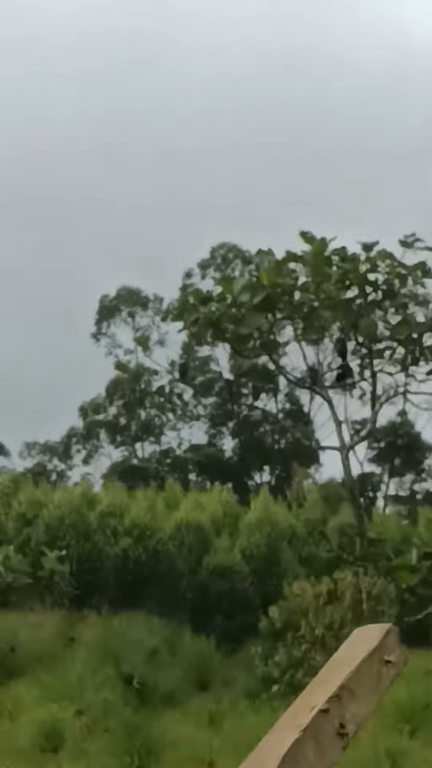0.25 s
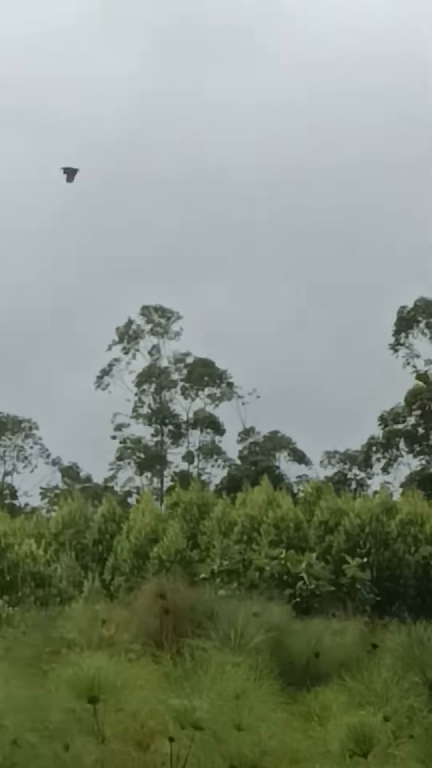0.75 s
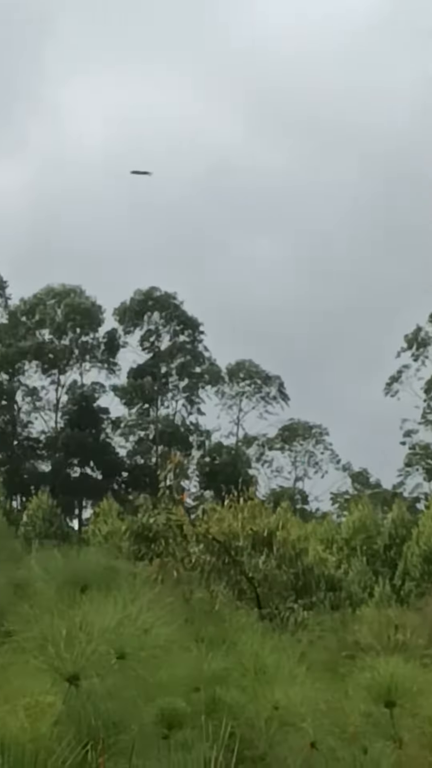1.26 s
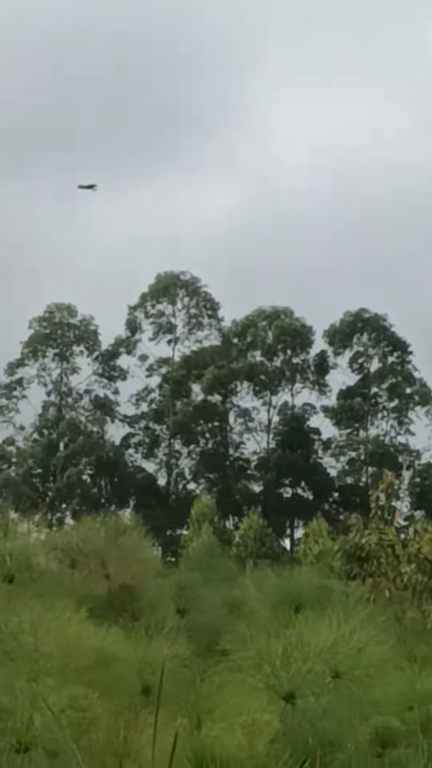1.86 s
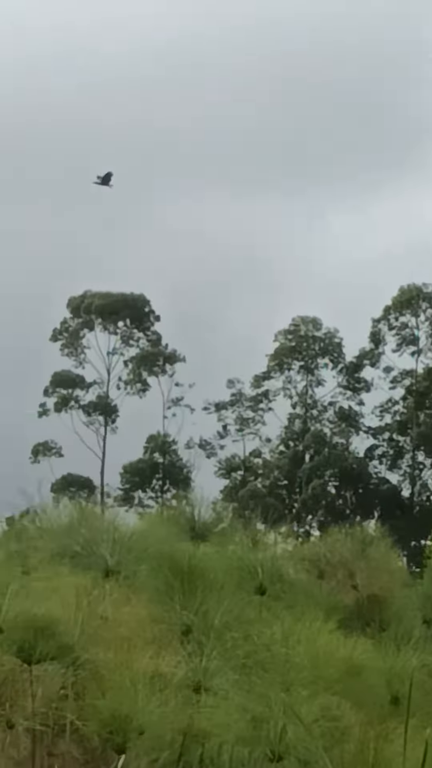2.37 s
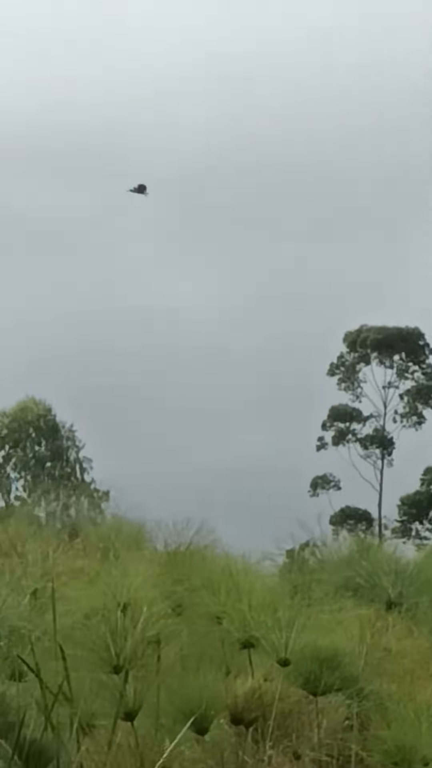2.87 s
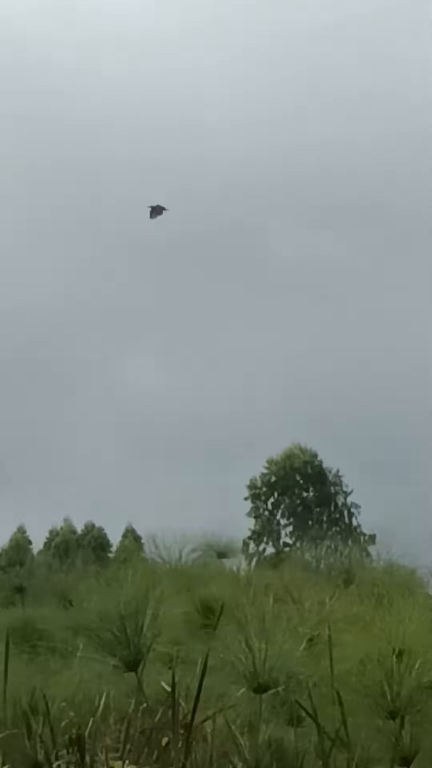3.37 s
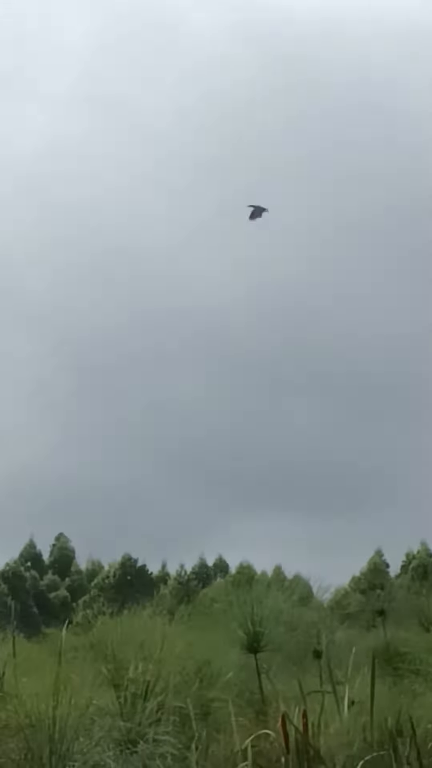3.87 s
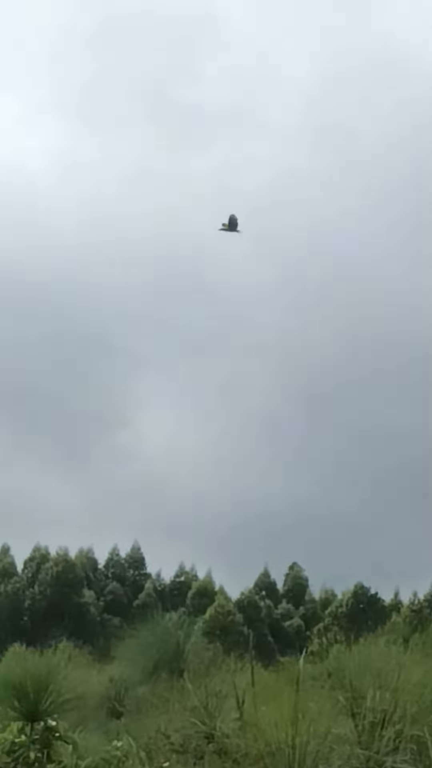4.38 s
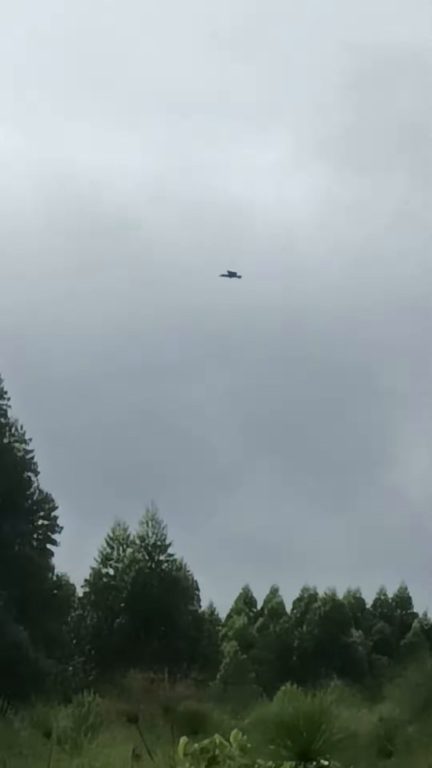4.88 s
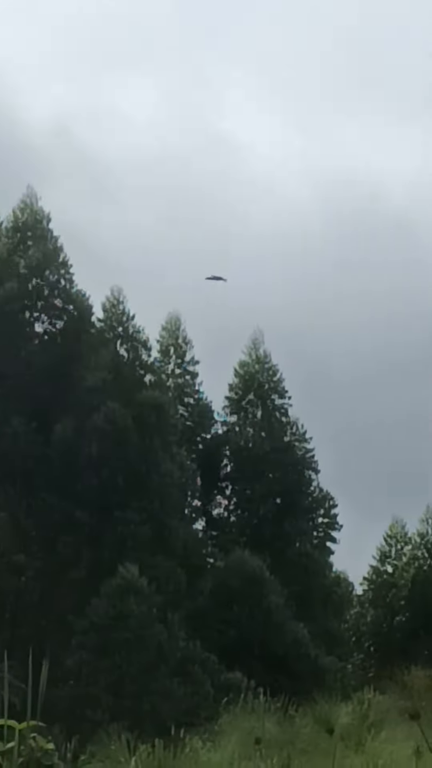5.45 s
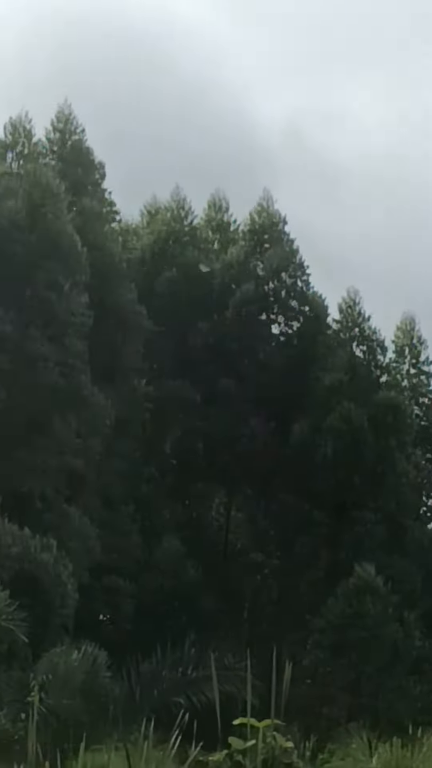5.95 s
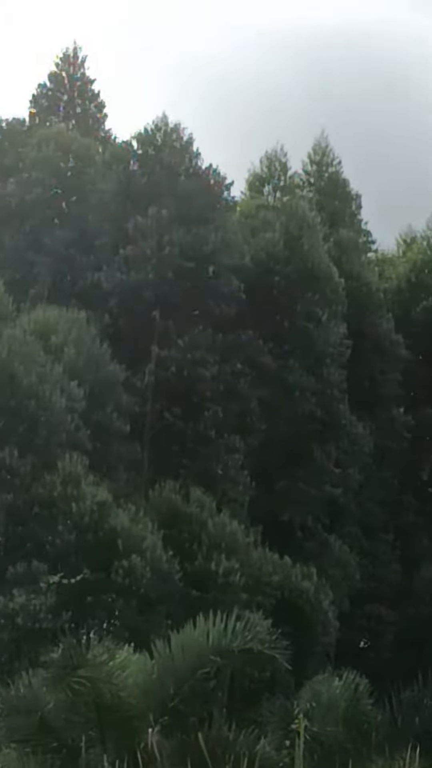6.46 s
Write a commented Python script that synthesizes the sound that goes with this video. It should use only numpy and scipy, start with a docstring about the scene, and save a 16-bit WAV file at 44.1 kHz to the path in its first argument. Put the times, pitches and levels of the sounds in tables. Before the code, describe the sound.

One long nasal, hoarse-edged bird cry echoes off trees over buzzing, chirping insects, then four evenly spaced sharp clacks and a dull bump.

```python
"""Insects buzz and chirp from the first moment, over a low rumble, while small birds whistle far off.
In this open marsh an ibis soon gives one long nasal cry: harmonics shaped by throat resonances, rising,
sinking and breaking up, and trees throw it back. Later four sharp clacks ring broad resonances half a
second apart, and a soft dull bump follows. Insects are pulsed noise bands and gliding tones, the birds
gliding sines, rumble and air filtered noise. Two spaced microphones hear it."""
import sys
import numpy as np
from scipy import signal
from scipy.fft import rfft, irfft
from scipy.io import wavfile
from scipy.ndimage import uniform_filter1d

SR = 44100
rng = np.random.default_rng(int(sys.argv[2]) if len(sys.argv) > 2 else 0)


def generate_wav(sig):
    """Save sig (samples, or channels by samples) to the path in sys.argv[1] as 16-bit PCM at SR."""
    pcm = np.round(np.clip(np.atleast_2d(sig).T, -1, 1) * 32767).astype(np.int16)
    wavfile.write(sys.argv[1], SR, pcm)


N = 296352
T = np.arange(N) / SR
HZ = np.fft.rfftfreq(2 * N, 1 / SR)
MIC_LAG_S = 0.00102


def undb(db):
    """Logarithmic level: decibels become an amplitude gain."""
    return 10 ** (np.asarray(db) / 20)


def unit(x):
    """Normalisation: scale to an rms of 1."""
    return x / np.sqrt(np.mean(x ** 2))


def curves(table):
    """Linear interpolation: each column of a time table, one value a sample."""
    s, *columns = np.transpose(table)
    return [np.interp(T, s, c) for c in columns]


def gain_at(hz, spectrum):
    """Frequency response: gain of a (frequency [Hz], level [dB]) table, interpolated on log frequency."""
    f, db = np.transpose(spectrum)
    return undb(np.interp(np.log(hz + 1), np.log(f), db))


def colour(x, spectrum):
    """Linear filtering: multiply the spectrum of a sound by a frequency response."""
    return irfft(rfft(x, 2 * N) * gain_at(HZ, spectrum))[..., :N]


def resonate(x, hz, width):
    """Resonance: one peak applied twice, for steep skirts."""
    b, a = signal.iirpeak(hz, hz / (1.55 * width), fs=SR)
    return signal.lfilter(b, a, signal.lfilter(b, a, x))


def walk(rate):
    """Random modulation: a continuous wander of spread 1 with `rate` new values a second."""
    levels = rng.standard_normal(8192)
    return unit(np.interp(T * rate, np.arange(len(levels)), levels))


def ports(x, pan_db, lag_s=MIC_LAG_S):
    """Time and level differences: the left microphone hears it later, the right one pan_db weaker."""
    left = np.pad(x, (round(lag_s * SR), 0))[:N]
    right = x * undb(-np.clip(pan_db, -3, 20))
    return np.array([left, right])


def echoes(x, t60, onset_s, spectrum, grain_db=4):
    """Diffuse scattering: many surfaces, a few strong, build up and decay, unrelated left and right."""
    t = T[:2 * SR]
    strength_db = grain_db * rng.standard_normal((2, len(t) // 100))
    strength = undb(np.repeat(strength_db, 100, axis=1))
    envelope = undb(-60 * t / t60) * (1 - np.exp(-t / onset_s))
    response = rng.standard_normal((2, len(t))) * strength * envelope
    response /= np.sqrt(np.sum(response ** 2, axis=1, keepdims=True))
    scattered = signal.fftconvolve(x[None], response, axes=1)[:, :N]
    return colour(scattered, spectrum)


# strength and direction of the cry: (time [s], relative level [dB], left minus right [dB])
CRY = [(1.418, -29.5, 6), (1.5, -30, 13), (1.56, -25.5, 10), (1.79, -25, 9.5), (1.849, -30.5, 16.5),
       (2.12, -31.5, 12.5), (2.26, -29.5, 10.5), (2.32, -37.5, 9), (2.37, -33.5, 5), (2.54, -34.5, 7)]
# fundamental of the cry: (time [s], frequency [Hz])
CRY_PITCH = [(1.42, 333), (1.444, 420.5), (1.462, 476.3), (1.518, 538.3), (1.578, 554.4), (1.738, 542.2),
             (2.002, 502.3), (2.33, 471.3), (2.454, 418), (2.476, 404.5), (2.504, 353.7), (2.54, 348.2)]
# resonances of throat and bill: (frequency [Hz], relative level [dB])
THROAT = [(520, -18), (740, -7), (900, -16.5), (1080, -19.5), (1450, -0.5), (1700, 5), (2200, -13.5),
          (2550, -27), (2950, -18), (3350, -32.5), (3750, -8.5), (4200, -21.5), (4600, -7.5), (5400, -5.5),
          (7300, -27), (8500, -33), (9600, -21.5), (10700, -35), (11700, -30.5), (14000, -60)]
# spectrum the trees send back: (frequency [Hz], relative level [dB])
TREES = [(400, -10), (1000, 4), (1700, -3.5), (2500, 4.5), (5000, -3), (10000, -43)]
CRY_LAG_S = 0.00094
HOARSE_JITTER = 0.0282  # spread of the pitch, as a fraction, at roughness 1


def ibis():
    """Source and filter: harmonics of a gliding pitch pass fixed throat resonances, hoarse at both ends."""
    hz, = curves(CRY_PITCH)
    db, pan_db = curves(CRY)
    envelope, treble, rough = cry_shape()
    on = envelope > 0
    # the membranes beat unevenly, the more so the hoarser the voice
    hz = hz * (1 + 0.00062 * walk(60) + HOARSE_JITTER * rough * walk(500))
    phase = 2 * np.pi * np.cumsum(hz) / SR
    body, edge = np.zeros(N), np.zeros(N)
    for k in range(1, 28):
        # shifting paths through the air make each harmonic flutter, the high ones most
        flutter = undb(0.83 * np.sqrt(k) * walk(20)[on])
        size = gain_at(k * hz[on], THROAT) * flutter
        partial = size * np.sin(k * phase[on] + rng.uniform(0, 2 * np.pi))
        # crossfade from body to edge between 2700 and 3500 Hz
        high = np.clip((k * hz[on] - 2700) / 800, 0, 1)
        body[on] += (1 - high) * partial
        edge[on] += high * partial
    # even out each part's strength over 25 ms, so that the envelopes below set it
    body, edge = (x / np.sqrt(np.abs(uniform_filter1d(x ** 2, SR // 40)) + 1e-5) for x in (body, edge))
    breath = unit(colour(rng.standard_normal(N), THROAT))
    rasp = breath * (1 + np.cos(phase)) * rough * undb(-17)
    body = envelope * undb(db) * (body + rasp)
    edge = envelope * treble * edge
    voice = body + edge
    left, right = ports(body, pan_db, CRY_LAG_S) + ports(edge, pan_db=11.0, lag_s=CRY_LAG_S)
    # the right side is shaded unevenly across the spectrum
    right = colour(right, [(500, 6.5), (1100, -2.5), (1600, -7), (2200, 8.5),
                           (3900, 5.5), (6300, 2.5), (9500, 2.5), (13000, 13.5)])
    early = echoes(voice, t60=0.28, onset_s=0.0049,
                   spectrum=[(500, -9), (1600, 7), (3000, 14.0), (5000, 9), (12000, 13)])
    late = echoes(voice, t60=2.49, onset_s=0.0067, spectrum=TREES)
    reflected = undb(-14.5) * early + undb(-15.5) * late
    return np.array([left, right]) + reflected * undb([[0], [-4]])


CRY_ATTACK_S, CRY_RELEASE_S, CRY_RELEASE_DB = 0.027, 0.1, -12.5
# the treble sags through the cry and drops further as it breaks up
CRY_TREBLE_DB, TREBLE_SAG_DB_PER_S, TREBLE_ATTACK_S, TREBLE_BREAK_DB = -31, 8, 0.058, -4
# roughness added at the start, held throughout and added at the end; how soon it clears and how long it breaks
HOARSE_START, HOARSE_HELD, HOARSE_END, CLEARS_S, BREAKS_S = 1, 0.05, 0.28, 0.11, 0.2


def cry_shape():
    """Temporal envelope: the cry swells, holds and dies away; treble comes later; both ends are hoarse."""
    start, end = CRY[0][0], CRY[-1][0]
    age = np.maximum(T - start, 0)

    def ending(length_s):
        """Linear ramp: 0 to 1 over the last length_s of the cry."""
        return np.clip(1 + (T - end) / length_s, 0, 1)

    attack = 1 - np.exp(-age / CRY_ATTACK_S)
    release = undb(CRY_RELEASE_DB * ending(CRY_RELEASE_S))
    envelope = attack * release * np.interp(T, [end, end + 0.0082], [1, 0])
    treble_db = CRY_TREBLE_DB - TREBLE_SAG_DB_PER_S * age + TREBLE_BREAK_DB * ending(BREAKS_S)
    treble = undb(treble_db) * (1 - np.exp(-age / TREBLE_ATTACK_S))
    rough = HOARSE_HELD + HOARSE_START * np.exp(-(age / CLEARS_S) ** 2)
    rough = rough + HOARSE_END * np.minimum(2 * ending(BREAKS_S), 1)
    return envelope, treble, rough


# clacks: (time [s], relative level [dB], body [dB], treble [dB], tail [dB], tail treble [dB], pitch factor [1])
CLACKS = [(4.67, -23.5, -8.5, -13, -11.5, 4.5, 1), (5.2023, -24, 1.5, 4, -12.5, 1, 0.99),
          (5.7157, -18, -4.5, 0, -9, 1.5, 0.983), (6.2337, -19.5, 5.5, 13.5, -9, 2.5, 0.94)]
# resonances a clack rings with: (frequency [Hz], width [Hz], relative level [dB])
CLACK_MODES = [(1045, 99, -10), (1505, 236, 5.5), (2886, 290, 4), (3920, 1270, 1.5), (8900, 1700, -9)]
# spectrum of the clacks scattered by the reeds: (frequency [Hz], relative level [dB])
CLACK_TAIL = [(400, -39), (900, -9.5), (1500, -1), (2200, -6), (3100, 4.5), (5200, 0.5), (6600, -0.5),
              (9600, -2.5), (11500, -9), (14000, -26)]


def clacks():
    """Impact excitation: a sharp blow rings broad modes for milliseconds; reeds and trees scatter it longer."""
    direct, scatter = np.zeros(N), np.zeros((2, N))
    # echoes arrive in clumps and interfere, so the tail is grainy and its spectrum ribbed
    ribs = undb(3 * np.interp(HZ, np.arange(400) * 110, rng.standard_normal(400)))
    hiss = irfft(rfft(rng.standard_normal((2, N)), 2 * N) * ribs)[:, :N]
    hiss = unit(colour(hiss, CLACK_TAIL) * undb(1.27 * walk(350)))
    sheen = colour(hiss, [(6500, -44), (9000, 6), (10800, 10), (12000, -30)])
    t = T[:SR // 20]
    swell = np.exp(-t / 0.0037) * (1 - np.exp(-t / 0.0032))
    for s, db, body_db, treble_db, tail_db, sheen_db, pitch in CLACKS:
        ring = 0
        for hz, width, mode_db in CLACK_MODES:
            mode = resonate(rng.standard_normal(len(t)) * swell, hz * pitch, width)
            tilt_db = body_db * (hz < 2000) + treble_db * (hz > 3500)
            ring = ring + unit(mode) * undb(mode_db + tilt_db)
        i = int((s - MIC_LAG_S) * SR)
        direct[i:i + len(t)] += unit(ring) * undb(db - 16.0)
        age = np.maximum(T - s, 0)
        # a fast and a slow decay together
        fade = undb(-60 * age / 0.14) + undb(-6.5) * undb(-60 * age / 0.79)
        fade = fade * (1 - np.exp(-age / 0.0011))
        tail = hiss + sheen * (undb(sheen_db) - 1)
        scatter += tail * undb(db + tail_db - 4.5) * fade
    return ports(direct, pan_db=7.5) + scatter * undb([[0], [-3.5]])


def insects():
    """Superposition: a rasp and chirps close by, with their scatter, add to wide choruses."""
    near = chirps() + rasp()
    scattered = echoes(near, t60=0.17, onset_s=0.0021, spectrum=[(5000, 7.0), (9000, -7.5)])
    return ports(near, pan_db=8) + undb(-7.0) * scattered + choruses()


# swells of the nearer rasping insect: (peak time [s], relative level [dB], centre frequency [Hz])
RASP_SWELLS = [(.02, -60, 7950), (1.17, -52.5, 7880), (2.7, -60, 7160), (3.698, -48.5, 7427),
               (4.22, -54, 7540), (5.15, -44, 7410)]
RASP_REST_DB, RASP_RISE_S, RASP_FALL_S = -63, 0.11, 0.064
RASP_SLIDE_HZ, RASP_JITTER_HZ = 90, 34.7


def rasp():
    """Amplitude and frequency modulation: wing strokes pulse a high tone that slides and is a little unsteady."""
    loud = undb(RASP_REST_DB)
    # each swell builds slowly and drops back faster
    for s, db, _ in RASP_SWELLS:
        loud = loud + undb(db) * np.exp(-np.maximum((s - T) / RASP_RISE_S, (T - s) / RASP_FALL_S))
    _, hz = curves(RASP_SWELLS)
    beat = 2 * np.pi * np.cumsum(46.6 * (1 + 0.01 * walk(6))) / SR
    # each wing stroke slides down in pitch
    hz = hz - RASP_SLIDE_HZ * np.sin(beat) + RASP_JITTER_HZ * walk(400)
    tone = np.sin(2 * np.pi * np.cumsum(hz) / SR)
    strokes = (1 + np.cos(beat)) / 2
    return tone * undb(2.3 * walk(90)) * strokes * loud


# runs of paired insect chirps: (start [s], end [s], mean level [dB])
CHIRP_RUNS = [(0.055, .21, -51), (0.46, .6, -51), (1.109, 1.38, -46), (1.682, 2.06, -47),
              (2.386, 2.65, -49.5), (2.977, 3.21, -50.5), (3.502, 3.78, -49.5), (4.099, 4.39, -50),
              (4.936, 5.38, -57)]


def chirps():
    """Frequency sweep: paired 10 ms pulses fall in pitch, repeated at a nearly steady rate."""
    out = np.zeros(N)
    t = T[:SR // 100]
    chirp = np.sin(np.pi * t / t[-1]) ** 2 * signal.chirp(t, 8650, t[-1], 7950)
    for start, end, run_db in CHIRP_RUNS:
        for s in np.arange(start, end, 0.0405):
            for delay in (0, 0.011):
                i = int((s + delay + 0.00059 * rng.standard_normal()) * SR)
                out[i:i + len(t)] += chirp * undb(run_db + 2 * rng.standard_normal())
    return out


# insect choruses: (lowest frequency [Hz], highest frequency [Hz], relative level [dB], pulse rate [1/s])
CHORUS = [(5098, 5790, -61, 53), (5260, 5580, -63.5, 27), (5950, 6320, -71, 19), (6910, 7630, -66.5, 32)]
# the choruses start eagerly and settle
EAGER_DB, SETTLE_S = 4, 1.7


def choruses():
    """Band-limited noise: wing resonances pass pulsing noise, one group towards each side."""
    out = np.zeros((2, N))
    eager_db = EAGER_DB * np.exp(-T / SETTLE_S)
    for low_hz, high_hz, db, rate in CHORUS:
        wings = signal.butter(3, sorted([low_hz, high_hz + 1]), "band", fs=SR, output="sos")
        for side_db in ([[0], [-10]], [[-9], [-2]]):
            beat = 2 * np.pi * np.cumsum(rate * (1 + 0.026 * walk(9.9))) / SR
            strokes = rng.standard_normal(N) * (1 + 0.33 * np.cos(beat))
            level = undb(db + eager_db + 0.5 * walk(2.33))
            out += unit(signal.sosfilt(wings, strokes)) * level * undb(side_db)
    return out


# a far bird's double swoop: (time into the phrase [s], frequency [Hz])
SWOOP = [(0, 1984), (.025, 1567), (.053, 877), (.07, 1059), (.09, 1750), (.13, 2162), (.165, 1450),
         (.19, 936), (.24, 1020)]
# its phrases: (start [s], relative level [dB])
SWOOPS = [(0.668, -58), (2.705, -60.5), (4.759, -57)]
# another bird's warble, a dip and an arch: (time into the phrase [s], frequency [Hz])
WARBLE = [(0, 3635), (.06, 2873), (.11, 3303), (.2, 3420), (.26, 2900)]
# its phrases: (start [s], relative level [dB])
WARBLES = [(4.41, -59.5), (4.925, -59), (5.399, -69), (5.981, -69), (6.51, -65.5)]
# rising notes that level off: (start [s], length [s], relative level [dB])
RISES = [(3.861, 0.11, -62.5), (4.163, 0.31, -60), (6.363, 0.13, -60.5)]
RISE_FROM_HZ, RISE_TO_HZ, RISE_S = 2350, 3400, 0.06
# falling slurs of small birds: (start [s], length [s], first frequency [Hz], relative level [dB])
SLURS = [(0.029, 0.081, 4120, -60.5), (0.232, .06, 3750, -64.5), (0.33, 0.049, 5100, -60),
         (0.412, .045, 5030, -59), (0.468, .045, 4960, -61), (.73, .045, 5060, -62),
         (0.809, .045, 5100, -55.5), (3.95, .05, 6820, -52), (4.108, .05, 6750, -52),
         (4.798, .04, 3500, -50.5)]
SLUR_OCTAVES_PER_S = 5
# moving air breaks up far whistles and blurs their pitch (a fraction)
WHISTLE_FLUTTER_DB, WHISTLE_WAVER = 4, 0.022


def songbirds():
    """Propagation through moving air: thin gliding sines waver, and trees blur them; a hoarse call joins."""
    song = np.zeros(N)
    waver = 1 + WHISTLE_WAVER * walk(160)
    flutter = undb(WHISTLE_FLUTTER_DB * walk(55))

    def add(start, length, db, pitch):
        """Frequency modulation: one whistle whose pitch is a function of its age."""
        on = (T > start) & (T < start + length)
        phase = 2 * np.pi * np.cumsum(pitch(T[on] - start) * waver[on]) / SR
        song[on] += undb(db) * np.sin(phase) * flutter[on] * signal.windows.tukey(on.sum(), 0.25)

    for shape, phrases in ((SWOOP, SWOOPS), (WARBLE, WARBLES)):
        ages, pitches = np.transpose(shape)
        for s, db in phrases:
            add(s, ages[-1], db, lambda age: np.interp(age, ages, pitches))
    for s, length, db in RISES:
        add(s, length, db, lambda age: RISE_TO_HZ + (RISE_FROM_HZ - RISE_TO_HZ) * np.exp(-age / RISE_S))
    for s, length, hz, db in SLURS:
        add(s, length, db, lambda age: hz * 2 ** (-SLUR_OCTAVES_PER_S * age))
    # strongest near 1.4 kHz, weakest near 2.2 kHz
    song = colour(song, [(900, -4), (1400, 7), (2200, -5.5), (3200, 1.5), (6000, -1.0)])
    song += far_caller()
    blurred = echoes(song, t60=0.5, onset_s=0.004, spectrum=[(1000, -10), (3300, -5.5)])
    return ports(song, pan_db=6) + blurred


def far_caller():
    """Resonant noise: a hoarse call around 1240 Hz swells and fades about 5.48 s."""
    swell = np.exp(-((T - 5.48) / 0.21) ** 4)
    return unit(resonate(rng.standard_normal(N), 1240, 400)) * undb(-62.5) * swell


def bump():
    """Damped impulse: a few milliseconds of noise push a low resonance, a soft dull bump by the microphones."""
    age = np.maximum(T - 6.62, 0)
    push = rng.standard_normal(N) * age / 0.0044 * np.exp(-age / 0.004)
    return ports(resonate(push, 310, 180) * undb(-20.0), pan_db=-3)


# spectrum of the low rumble: (frequency [Hz], relative level [dB per Hz])
RUMBLE = [(20, -22), (33, -4), (52, -0.5), (85, -2.5), (125, -11), (170, -19), (300, -23), (700, -53)]
# spectrum of the open air: (frequency [Hz], relative level [dB per Hz])
AIR = [(100, -4.5), (300, -1.5), (650, -3.5), (1200, -5.5), (2400, -9), (3400, -7.5), (4600, -9),
       (8000, -4), (9000, -14.5), (10800, -11), (11800, -20.5), (15500, -19.5)]


def air():
    """Filtered noise: a low distant rumble under the faint hiss of grass and trees."""
    rumble = unit(colour(rng.standard_normal(N), RUMBLE)) * undb(-54.5 + walk(10))
    hiss = unit(colour(rng.standard_normal((3, N)), AIR)) * undb(0.44 * walk(2.75))
    # two hisses unrelated left and right, and a third from one direction
    wide = undb(-62.5) * hiss[:2]
    sided = undb(-61.0) * ports(hiss[2], pan_db=15.0)
    return ports(rumble, pan_db=3.5) + wide + sided


def scene():
    """Superposition: the cry and the clacks over the life of the marsh."""
    return ibis() + clacks() + insects() + songbirds() + bump() + air()


def record(dry):
    """Band limiting: a steep elliptic low-pass removes the top above 15750 Hz."""
    return signal.sosfilt(signal.ellip(10, 0.2, 70, 15750, fs=SR, output="sos"), dry)


dry = scene()
out = record(dry)
generate_wav(out)
```